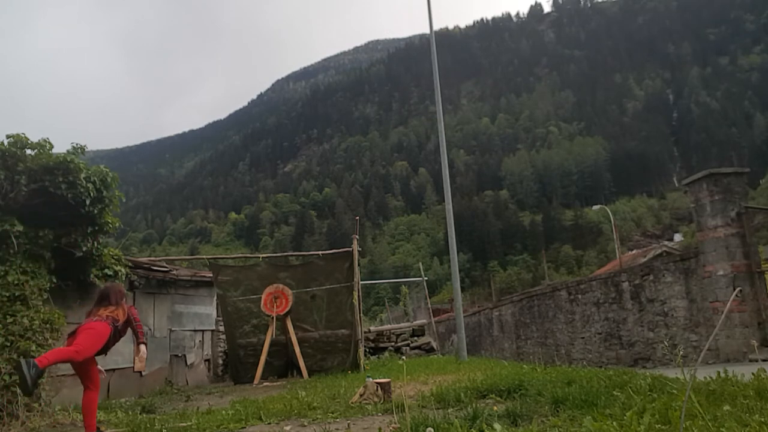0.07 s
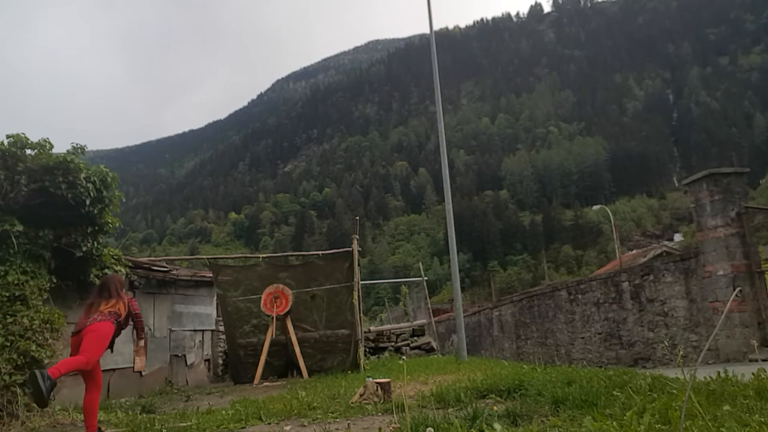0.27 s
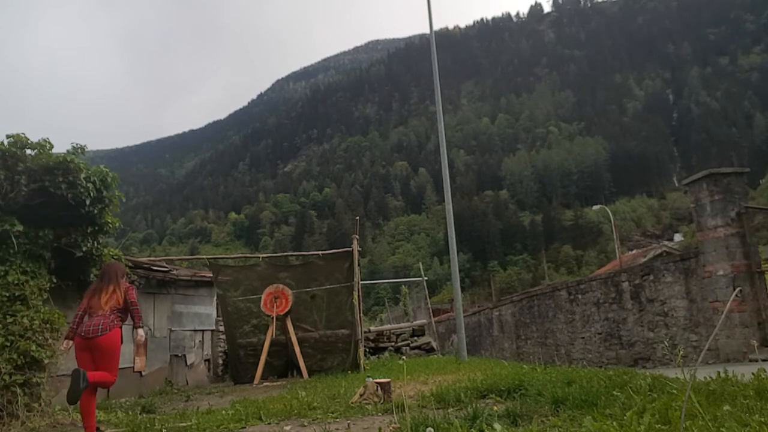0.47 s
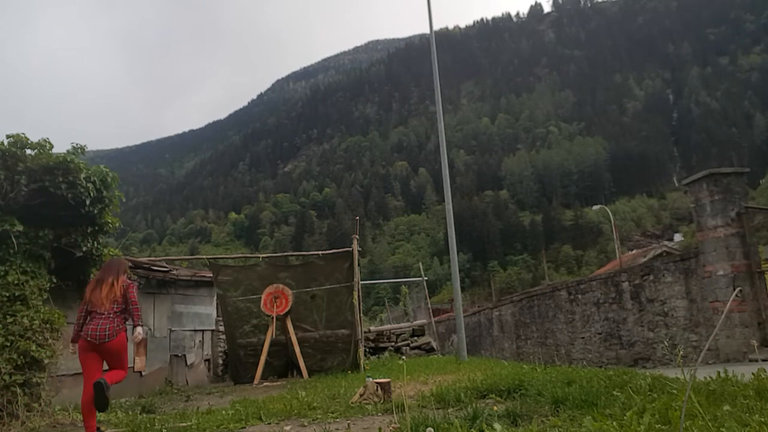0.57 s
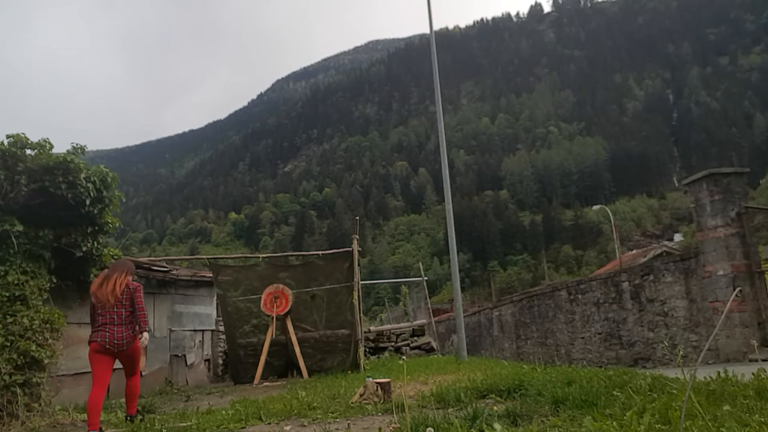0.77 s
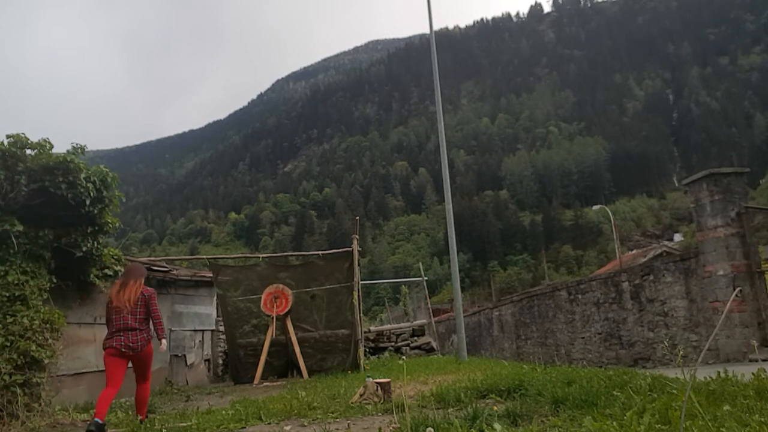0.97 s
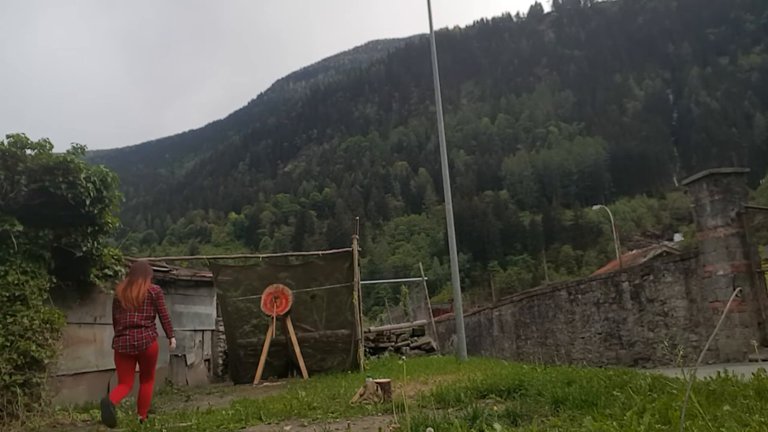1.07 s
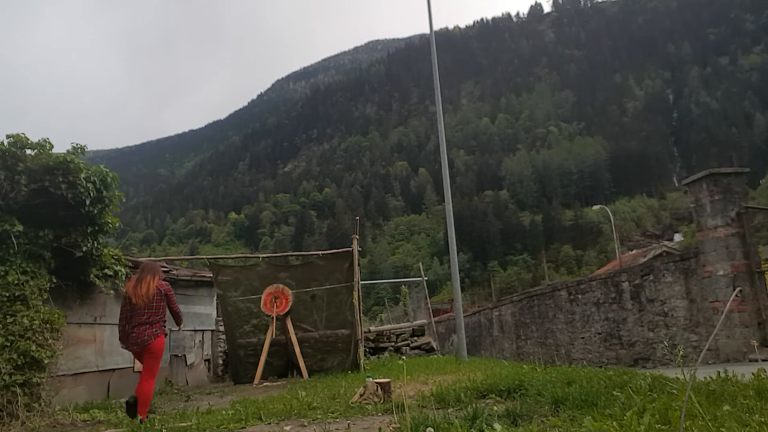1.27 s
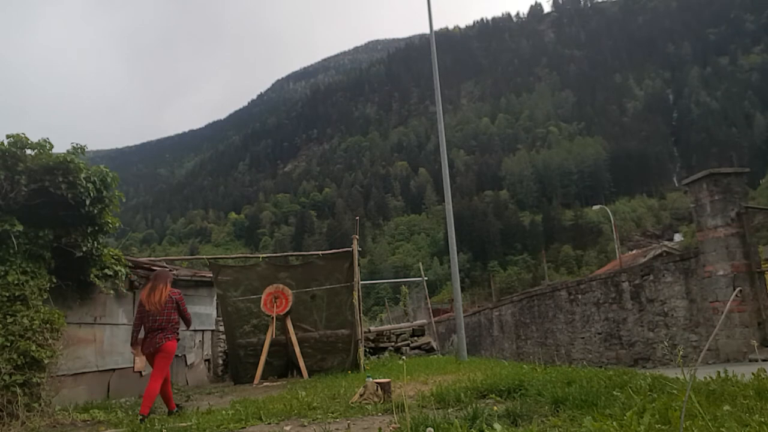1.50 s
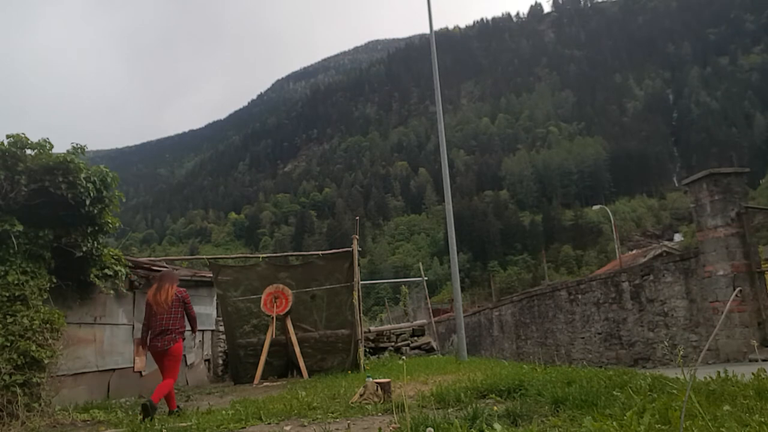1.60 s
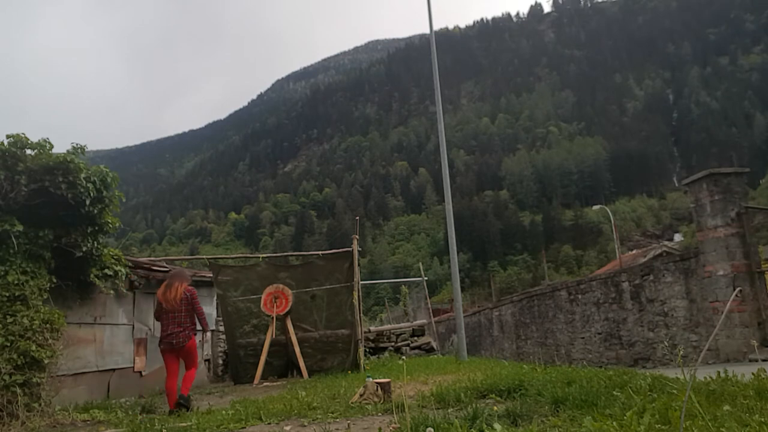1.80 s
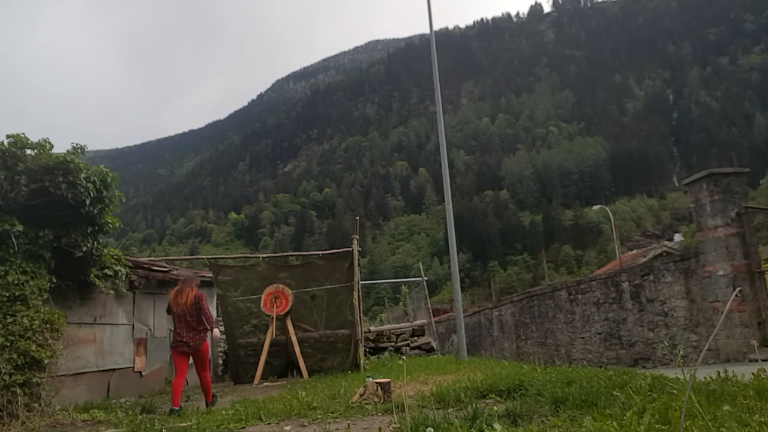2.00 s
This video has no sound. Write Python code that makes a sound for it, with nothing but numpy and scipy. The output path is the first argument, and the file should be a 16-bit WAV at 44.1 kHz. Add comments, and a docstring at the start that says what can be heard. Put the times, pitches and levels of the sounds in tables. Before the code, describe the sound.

In a garden, a stereo recorder some metres off catches an axe biting into wood, a hard knock with slight low thump and quick reflections; afterwards a faint twig tick, distant bird and soft traffic-and-wind hum.

```python
"""Axe into a wooden target

A thrown axe bites into a wooden target on a stand, some metres from a small stereo recorder in a garden.
Jolts of the blade ring the wood and steel, fibres crackle, the stand thumps; sheds and walls throw it back.
The valley hums with distant traffic and wind in the trees, made of smooth noise shaped by frequency.
A twig snaps underfoot as force pulses ring it, and a far bird whistles faintly in gliding sines."""
import sys
import numpy as np
from scipy import signal
from scipy.fft import rfft, irfft
from scipy.io import wavfile
from scipy.ndimage import uniform_filter1d

SR = 44100
rng = np.random.default_rng(int(sys.argv[2]) if len(sys.argv) > 2 else 0)


def unload_wav(signal):
    """Save mono or channel-first audio to the path in sys.argv[1] as 16-bit WAV at rate SR, clipped to [-1, 1]."""
    wavfile.write(
        sys.argv[1],
        SR,
        np.round(np.clip(np.atleast_2d(signal).T, -1, 1) * 32767).astype(np.int16),
    )


def field_ratio(decibels):
    """Amplitude ratio for a level in dB (20 dB per decade); scalars and array-likes work."""
    return 10 ** (np.asarray(decibels, dtype=float) / 20)


N = 90404  # samples

# jolts of the blade in the wood, left minus right in dB, left later in ms:
# start_s, relative_level_db, contact_ms, left_right_db, left_later_ms
JOLTS = [(.2003, -16, .45, 1, -.02), (.2014, -11, 1.3, 1, 0.02), (.2037, -11, 1.3, 1, 0.02),
         (.2056, -15, .35, 3, .1), (.2078, -4, .34, 1.5, .02), (.2101, 0, 1.3, 1, 0.02),
         (.2134, -6, .33, -2, .17), (.2182, -6, 1.0, 1, .02), (.2252, -9, 1.3, 1, .02)]


def evened(x):
    """Scales to rms 1."""
    return x / np.sqrt(np.mean(x ** 2) + 1e-20)


def read(points, hz):
    """Reads a table on a log-frequency axis."""
    f, value = np.transpose(points)
    return np.interp(np.log(hz + 1), np.log(f + 1), value)


def high_pass(x, cut_hz):
    """Second-order Butterworth low cut."""
    return signal.lfilter(*signal.butter(2, cut_hz, "high", fs=SR), x)


def ring(modes, seconds, rise_s):
    """Resonances of a struck body: a sum of dying sines with a linear rise."""
    t = np.arange(round(seconds * SR)) / SR
    rings = sum(field_ratio(db - 60 * t / t60) * np.sin(2 * np.pi * hz * t) for hz, db, t60 in modes)
    return rings * np.minimum(t / rise_s, 1)


def struck(force, response):
    """Lets the force at each microphone set off the same ringing."""
    return signal.oaconvolve(force, response[None], axes=1)[:, :N]


def push(s, width_ms):
    """A smooth force pulse of area 1 starting at s."""
    u = np.clip((np.arange(N) / SR - s) / (width_ms / 1000), 0, 1)
    shape = np.sin(np.pi * u) ** 2
    return shape / (shape.sum() + 1e-12)


def placed(s, level_db, width_ms, pan_db, later_ms):
    """The pulse as each microphone gets it: the left by pan_db louder and later_ms later."""
    left = field_ratio(level_db + pan_db / 2) * push(s + later_ms / 1000, width_ms)
    right = field_ratio(level_db - pan_db / 2) * push(s, width_ms)
    return np.array([left, right])


def valley():
    """Smooth noise with faint patches and swell, arriving a little from the left."""
    # spectrum of the hum: frequency_hz, relative_db_per_hz
    hum_spectrum = [(20, -11), (40, -13), (65, -17), (110, -11.5), (200, -12), (400, -6), (800, -6),
                    (1300, -8.5), (2000, -10), (3000, -17.5), (4500, -27), (6300, -37), (8500, -42.5),
                    (10500, -43.5), (13000, -40), (16000, -41.5)]
    # likeness of the two microphones, held to 0..1: frequency_hz, left_right_likeness
    likeness = [(60, 2), (130, .99), (300, 1.1), (640, 0.29), (1400, 0.51), (3000, 0.07), (6000, 0.5),
                (9000, -1.56), (15000, .05)]
    # balance of the two microphones: frequency_hz, left_right_db
    balance = [(60, 0.5), (110, 0.6), (200, 0.36), (380, 1.0), (700, 0.83), (1290, 3.7), (2380, 4.4),
               (4400, 4.8), (8120, 1.2), (15000, 0.39)]
    hum_db, patch_db, swell_db, lead_ms = -49, .6, .25, 0.22
    frames, hz = N // 256 + 5, np.fft.rfftfreq(1024, 1 / SR)
    a, b, c, d, patches = rng.standard_normal((frames, 513, 5)).T
    patches = evened(uniform_filter1d(uniform_filter1d(patches, 12, 0), 14, 1))
    swell = evened(uniform_filter1d(rng.standard_normal(frames), 40))
    same = np.clip(read(likeness, hz), 0, 1)[:, None]
    late = np.exp(-2j * np.pi * hz * lead_ms / 1000)[:, None]
    lean = field_ratio(read(balance, hz) / 2)[:, None]
    left = a + 1j * b
    right = same * left * late + np.sqrt(1 - same ** 2) * (c + 1j * d)
    z = np.array([left * lean, right / lean])
    z *= field_ratio(read(hum_spectrum, hz)[:, None] + patch_db * patches + swell_db * swell)
    hum = signal.istft(z, nperseg=1024, noverlap=768)[1][:, :N]
    return field_ratio(hum_db) * evened(hum)


def bird():
    """Faint gliding whistles, sines that waver with distance, a little louder on the left."""
    # whistles (a negative fall rises): start_s, length_s, relative_level_db, pitch_hz, fall_hz
    whistles = [(1.165, .065, -68, 2270, 10), (1.225, .105, -65.5, 2310, 90), (1.6, .04, -68, 2450, 90),
                (1.69, .085, -67.5, 2270, -20)]
    t, out = np.arange(N) / SR, np.zeros(N)
    waver = 1 + .2 * evened(uniform_filter1d(rng.standard_normal(N), 900))
    for start, length, db, hz, fall_hz in whistles:
        u = np.clip((t - start) / length, 0, 1)
        swell = np.sqrt(2 * np.sin(np.pi * u).clip(0))
        phase = 2 * np.pi * np.cumsum(hz - fall_hz * u ** 2) / SR
        out += field_ratio(db) * swell * waver * np.sin(phase)
    return out * field_ratio(np.array([[2], [0]]))  # left, right dB


def twig():
    """Two tiny dry snaps: brief forces, each with a dying spray of crumbs, ring the twig."""
    # snaps: start_s, relative_level_db, left_right_db
    snaps = [(.8493, -49, 0.5), (0.8646, -36, 0.5)]
    # what the twig rings with: frequency_hz, relative_level_db, t60_s
    twig_modes = [(2200, -14, .03), (4900, 0, .005), (6800, -7, .004), (8000, -8, .004), (10300, -5, .004),
                  (12500, -2, .005), (14000, -6, .004)]
    crumbs_db, crumbs_s, rise_s = -14, .0008, 0.00062
    force = sum(placed(s, db, 0.078, pan_db, 0) for s, db, pan_db in snaps)
    fade = np.exp(-np.arange(400) / SR / crumbs_s)
    crumbs = field_ratio(crumbs_db) * rng.standard_normal((2, 400)) * fade
    crumbs[:, 0] = 1  # the snap itself
    force = signal.oaconvolve(force, crumbs, axes=1)
    return struck(force, ring(twig_modes, .05, rise_s))


def garden(x):
    """Close scatter, a long thin tail by band, and a dull echo from a far wall."""
    # decay of the long tail: frequency_hz, t60_s
    tail_decay = [(60, 1), (250, 0.41), (600, 0.18), (1500, 0.16), (4000, 0.34), (12000, 0.086)]
    near_db, near_t60, far_db, far_rise_s = -9, .1, -21, 0.09
    wall_db, wall_s, wall_spread_s, wall_top_hz = -24, .088, .016, 1200
    wide_hz = 714  # above this the answer differs between the microphones
    size = SR // 2
    t = np.arange(size) / SR
    taps = rng.standard_normal((3, 3, size))  # near, far, wall by common, left, right
    taps = taps[:, :1] + high_pass(taps[:, 1:], wide_hz)

    def unit(v):
        """Scales both sides so that the left has energy 1."""
        return v / np.linalg.norm(v[0])

    near = unit(taps[0] * field_ratio(-60 * t / near_t60) * (t > .002))
    hz, frames, z = signal.stft(taps[1], SR, nperseg=512)
    z = z * field_ratio(-60 * frames / read(tail_decay, hz)[:, None])
    tail = signal.istft(z, SR, nperseg=512)[1][:, :size]
    far = unit(tail * np.minimum(t / far_rise_s, 1))
    dull = signal.lfilter(*signal.butter(2, wall_top_hz, fs=SR), taps[2])
    wall = unit(dull * np.exp(-.5 * ((t - wall_s) / wall_spread_s) ** 2))
    answer = field_ratio(near_db) * near + field_ratio(far_db) * far + field_ratio(wall_db) * wall
    return signal.fftconvolve(x.mean(0)[None], answer, axes=1)[:, :N]


def stand():
    """The stand rocks on its legs: the first jolt sets off one low, dying thump."""
    thump = ring([(69.2, -36, 0.25)], .6, 0.0087)  # frequency_hz, level_db, t60_s
    return signal.oaconvolve(push(JOLTS[0][0], 0.82), thump)[:N]


def wood():
    """The jolts ring the target and stand, which radiate little of the lowest bass."""
    # resonances of target and stand: frequency_hz, relative_level_db, t60_s
    wood_modes = [(105, -7.5, 0.088), (219.2, -5.5, 0.17), (310, -7.5, 0.049), (500, -1.5, 0.1),
                  (574, 1, 0.041), (712, -6, 0.038), (904, -3, 0.062), (1150, 1.5, 0.033), (1280, 0, 0.025),
                  (1510, 7.5, 0.024), (1676, 9, 0.07), (2023, 10, 0.02), (2220, -13, 0.018),
                  (2940, -4.5, .015)]
    hit_db, radiates_hz = -26.5, 129
    force = sum(placed(*row) for row in JOLTS)
    rung = -field_ratio(hit_db) * struck(force, ring(wood_modes, .3, .0001))
    return high_pass(rung, radiates_hz)


def steel():
    """The steel head pings once, set off by one very short pulse."""
    # resonances of the head: frequency_hz, relative_level_db, t60_s
    steel_modes = [(4200, -38, .02), (5000, -38, .01)]
    return struck(placed(.2052, 0, 0.049, 5, 0), ring(steel_modes, .05, 0.00073))


def fibres():
    """Fibres splitting under the edge: shaped noise from the first bite, held briefly, then dying."""
    # spectrum of the crackle: frequency_hz, relative_db_per_hz
    fibre_spectrum = [(1500, -9), (2500, 3.5), (4300, -4), (6000, -9), (8300, -14), (10000, -20),
                      (13000, -16), (15500, -22)]
    level_db, hold_s, t60 = -48.5, 0.0058, 0.15
    noise = rng.standard_normal((2, N))
    noise = irfft(rfft(noise) * field_ratio(read(fibre_spectrum, np.fft.rfftfreq(N, 1 / SR))), N)
    t = np.arange(N) / SR - JOLTS[0][0]
    envelope = field_ratio(level_db - 60 * np.maximum(t - hold_s, 0) / t60) * (t > 0)
    return envelope * evened(noise)


def axe():
    """The bite: ringing wood, pinging steel and a short crackle of fibres."""
    return wood() + steel() + fibres()


def scene():
    """Everything at the two microphones."""
    hit = axe()
    return hit + garden(hit) + stand() + twig() + bird() + valley()


def low_pass(x):
    """Removes everything above the highest recorded frequency."""
    return signal.sosfilt(signal.butter(12, 16390, fs=SR, output="sos"), x)


def record(dry):
    """The microphones' low cut at 45 Hz thins the deepest bass."""
    mix = high_pass(dry, 45)
    return low_pass(mix)


dry = scene()
out = record(dry)
unload_wav(out)
```